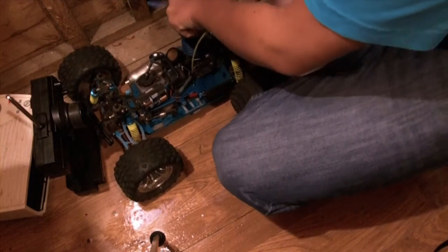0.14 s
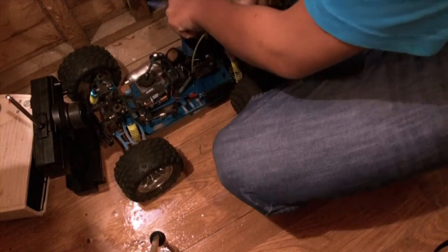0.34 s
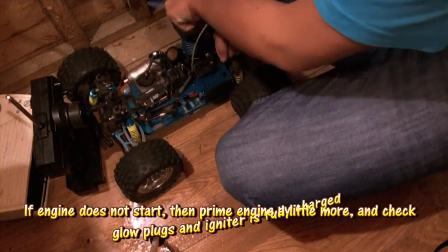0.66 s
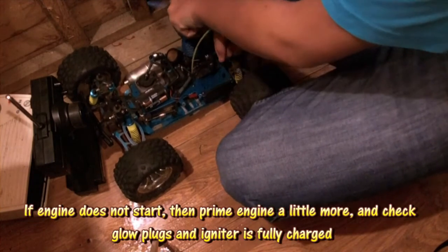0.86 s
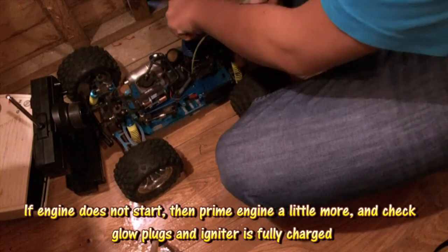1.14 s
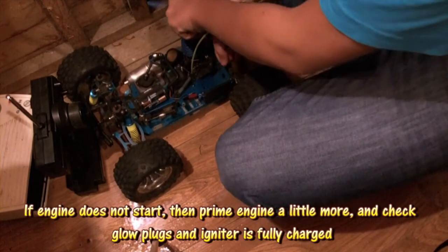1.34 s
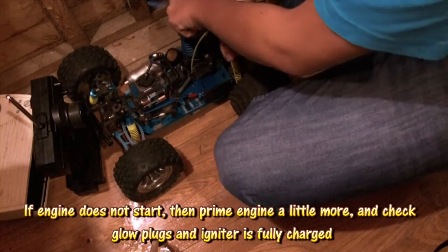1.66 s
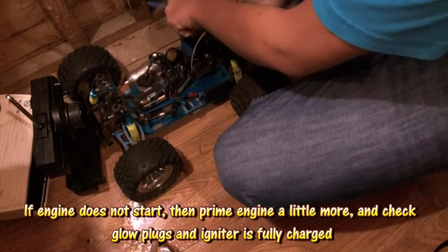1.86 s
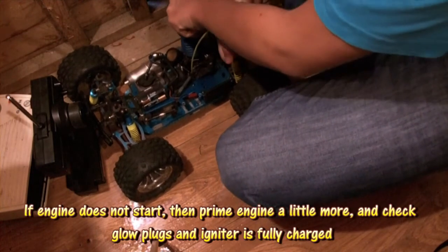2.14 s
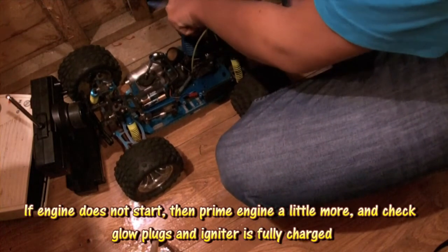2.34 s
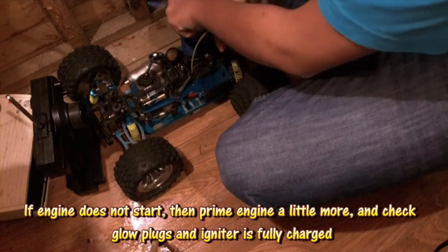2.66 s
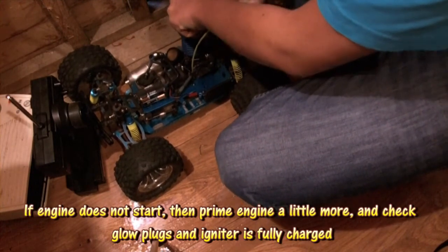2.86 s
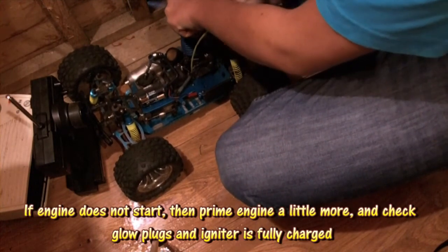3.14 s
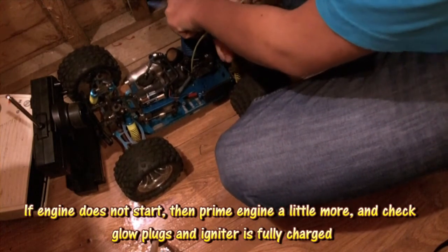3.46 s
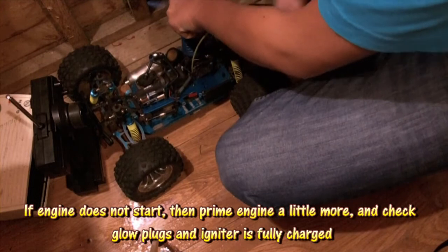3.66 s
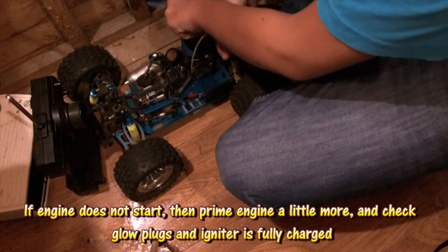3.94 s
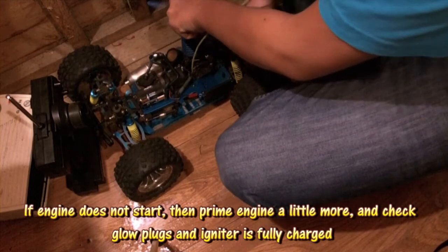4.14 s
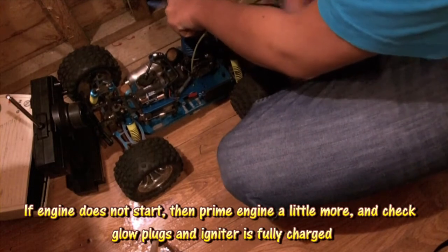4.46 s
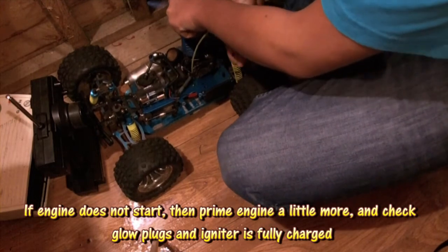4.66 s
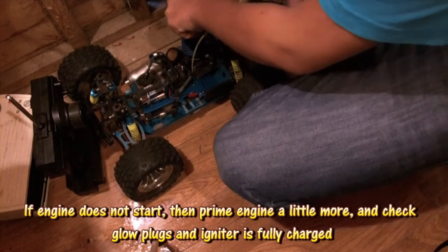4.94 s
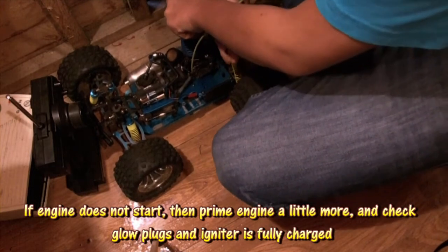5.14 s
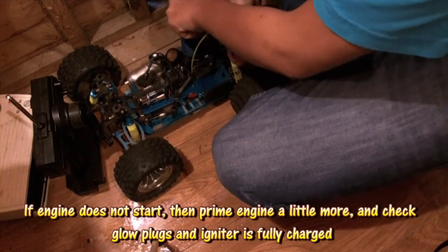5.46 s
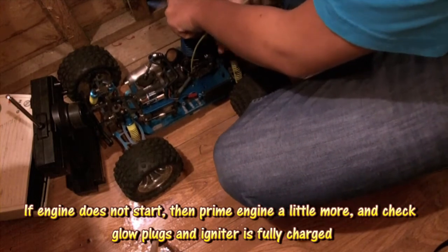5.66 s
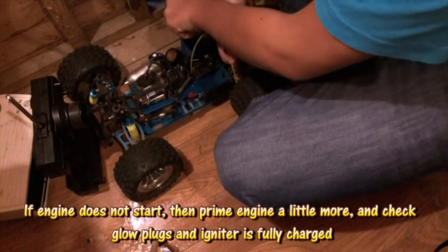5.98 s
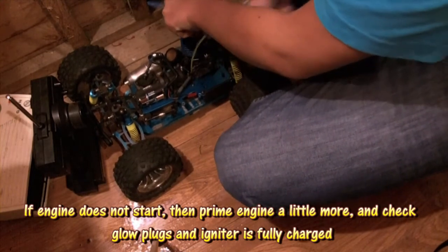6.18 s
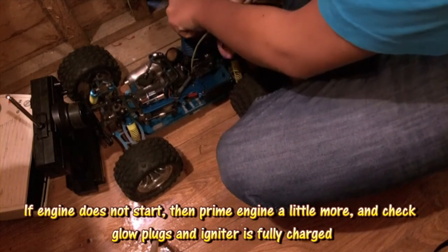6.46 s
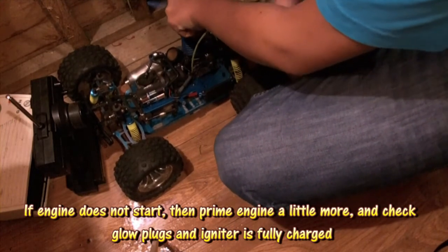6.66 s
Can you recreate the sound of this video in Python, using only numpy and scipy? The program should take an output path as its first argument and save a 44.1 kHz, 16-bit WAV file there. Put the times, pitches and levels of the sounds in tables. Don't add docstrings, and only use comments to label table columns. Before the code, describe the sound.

A small engine's pull cord is yanked again and again in a cramped wooden shed, each pull a rattling, puffing burst that never fires.

```python
import sys
import numpy as np
from scipy import signal
from scipy.fft import rfft, irfft, next_fast_len
from scipy.io import wavfile
from scipy.ndimage import uniform_filter1d

SR = 44100
rng = np.random.default_rng(int(sys.argv[2]) if len(sys.argv) > 2 else 0)


def decibels_to_gain(level_db):
    exponent = np.asarray(level_db, float) / 20
    return 10 ** exponent


def dump(signal):
    limited = np.clip(np.atleast_2d(signal).T, -1, 1)
    pcm = np.round(limited * 32767).astype(np.int16)
    wavfile.write(sys.argv[1], SR, pcm)


N = 300497

# f/Hz, level/dB [per Hz]
ROOM_AIR = [(18, -46), (30, -15), (55, -14.5), (129, -23), (205, -11), (404, -8), (859, -3.5), (1920, -8.5),
            (2920, -13.5), (8470, -16), (15000, -22.5)]
ROOM_AIR_DB = -59.5
# t/s, level/dB
RUSTLE = [(0.0, -70), (0.19, -82), (0.44, -74), (0.68, -66.5), (1.17, -52), (1.35, -83), (2.05, -66),
          (2.18, -66.5), (2.94, -56.5), (3.64, -63), (3.77, -61), (5.01, -63), (5.14, -60), (5.44, -57.5),
          (6.2, -57), (6.81, -63)]
# f/Hz, level/dB
RUSTLE_COLOUR = [(250, -8), (600, 0), (1600, -6), (2400, -20.5)]

CATCHES_S = [-.13, .256, 1.0941, 1.5839, 2.0199, 2.4478, 2.8719, 3.3064, 3.7207, 4.1472, 4.5991, 5.0026,
             5.4285, 5.8692, 6.3291, 6.7149]
# rattle peak level/dB, swell t/s, hold t/s, fall t/s
PULLS = [(-32.5, 0.043, .03, .055), (-27.5, 0.047, 0.0062, 0.061), (-27.5, 0.046, 0.029, 0.054),
         (-25, 0.031, 0.025, .062), (-26.5, 0.035, 0.026, 0.055), (-24.5, 0.046, 0.0068, 0.063),
         (-25.5, .052, 0.0072, 0.054), (-25.5, 0.05, 0.0047, 0.053), (-27, 0.03, 0.038, 0.062),
         (-25.5, 0.043, 0.032, 0.05), (-26.5, 0.038, 0.033, 0.055), (-27, 0.03, 0.045, 0.053),
         (-24.5, 0.054, 0.014, 0.045), (-24.5, 0.059, 0.0095, 0.056), (-25.5, .028, 0.031, 0.042),
         (-26, 0.043, 0.034, 0.047)]
RATTLE_REL_DB = (-1.27, -18, -22.5, -43)
HISS_OVER_DB = (-0.5, -2.5, -2.5, -10, 0, -2.5)
RATTLE_START_DB = -36.5
REWIND_LAG_S, REWIND_S = 0.015, 0.074
# f/Hz, width f/Hz, level/dB
CHASSIS = [(685, 15, -11), (875, 16.3, -0.5), (970, 37, -2), (1132, 53, -3.5), (1427, 49, -9),
           (1532, 46, -4), (1740, 46, -6.5), (1823, 37, 1), (1845, 20, -1.5), (1943, 86, 1.5),
           (2206, 24, -5), (2700, 66, -11)]
# f/Hz, width f/Hz, level/dB
CASING = [(3546, 280, 1), (4070, 130, 3), (5300, 530, -3), (5546, 114, 4.5), (7470, 280, -5),
          (8500, 210, 0), (9270, 1100, -15), (10470, 390, -3), (12000, 83, -14), (9050, 70, 4),
          (9600, 130, -1), (10150, 41, -10.5), (11440, 90, -2), (12650, 90, -6.5)]
# f/Hz, level/dB [per Hz]
GAS = [(2400, -9), (2900, -4.5), (6000, -4), (10500, -4.5), (12100, -16), (12900, -16.5), (13600, -29),
       (15500, -21)]
# f/Hz, level/dB [per Hz]
THUD = [(25, -44), (45, -14), (75, -41.5), (130, -29.5), (200, -5.5), (300, -9), (450, 6), (600, -2),
        (1200, 0.5), (2500, -7), (3500, -53)]
# f/Hz, level/dB
CLATTER = [(500, -10), (900, -1), (1900, 0), (2400, -7), (3300, -10), (4200, -24)]

# t/s, peak level/dB, treble
# minus peak level/dB, t60 t/s, main ring f/Hz
SHIFTS = [(0.043, -40.5, -36, 0.2, 1540), (.1236, -54, -19, .12, 1500), (0.257, -26.5, 2.5, 0.15, 1800),
          (.5314, -60.5, 17, 0.07, 1440), (0.6663, -36.5, -22, 0.097, 1650), (.8035, -41, -8, 0.18, 1450),
          (.9026, -43, -5.5, 0.11, 840), (1.3053, -45.5, -23, 0.2, 2030), (3.074, -37, -30, 0.089, 1050),
          (4.0218, -46, -22, 0.09, 1780), (5.1827, -51.5, 18.5, 0.09, 818)]
SHIFT_BASS_DB = -19
# t/s, peak level/dB, treble minus peak level/dB, t60 t/s
TAKE_UPS = [(.2094, -48.5, 4, 0.69), (1.0554, -44.5, .6, 0.55), (1.5342, -46, -0.5, 0.62),
            (1.9649, -52, -13, .11), (2.3895, -48.5, 1, 0.57), (2.819, -49, 2, 0.88),
            (3.2585, -46, 2, 0.34), (3.679, -42.5, 7.5, .16), (4.098, -46.5, 3.5, 0.43),
            (4.557, -39, 7, 0.15), (4.955, -42.5, 4.5, 0.23), (5.387, -36.5, 6.5, .17),
            (5.8312, -41.5, 9, 0.14), (6.6778, -39, 8, .17)]
TAKE_UP_HZ, TAKE_UP_BASS_DB = 2050, -5
# t/s, peak level/dB, treble minus peak level/dB, ring f/Hz
RECOILS = [(0.3742, -39, -34, 1190), (0.4114, -38, -2.5, 1960), (1.251, -34.5, -24, 1370),
           (1.721, -32.5, -17, 1790), (2.141, -27.5, -8, 1830), (2.5664, -32, -18, 2080),
           (2.584, -29.5, -5, 1840), (3.0034, -26.5, -3, 1800), (3.4363, -25.5, -3.5, 1860),
           (3.8483, -31, -6, 2100), (3.8838, -28.5, -6, 1870), (4.279, -25.5, -6.5, 1850),
           (4.319, -41.5, -6, 1800), (4.7334, -34.5, -22, 1830), (5.557, -32, -30, 1740),
           (5.595, -48.5, 9, 703), (6.01, -28, -5, 1940), (6.034, -38, -22, 1170), (6.449, -28.5, -7, 1890)]
RECOIL_T60_S, RECOIL_BASS_DB = 0.13, -32
CATCH_DB, CATCH_T60_S = -41, 0.06
# f/Hz, level/dB
BOARD_COLOUR = [(250, 7), (400, -3), (900, 10), (1300, -20)]
SPRING_COLOUR = [(2100, -20), (2600, 1), (3300, -2.5), (4600, -9)]

# t/s, peak level/dB
CREAKS = [(0.238, -35.5), (1.074, -41), (1.562, -41), (2, -37), (2.427, -42), (2.854, -36.5), (3.285, -38),
          (3.703, -45), (4.124, -42), (4.577, -39), (4.981, -40.5), (5.409, -40), (5.851, -41),
          (6.307, -37), (6.694, -43)]
CREAK_HZ, CREAK_WIDTH_HZ = 1070, 860

# first puff t/s, first turn t/s, driven puffs [count], last driven turn t/s, its puff level/dB
TURNS = [(.2601, .0208, 3, .0197, -25), (1.0969, .0199, 4, .0222, -24.6), (1.5872, .0217, 3, .0205, -28.6),
         (2.0232, .0218, 3, .0205, -28), (2.451, .0214, 3, .0196, -24.7), (2.8751, .0214, 3, .02, -26.4),
         (3.3095, .0206, 3, .0194, -23.9), (3.7237, .0197, 4, .0191, -24.9),
         (4.1506, .0196, 4, .0193, -25.4), (4.6019, .0193, 4, .0251, -27.2),
         (5.0057, .0196, 4, .0219, -25.9), (5.4316, .0192, 4, .0301, -26.5),
         (5.8722, .0202, 4, .021, -29.3), (6.3324, .0198, 3, .019, -26.5), (6.718, .0193, 4, .0196, -24.6)]
SECOND_TURN_SHARE = 0.884
FIRST_PUFF_DB, FULL_PUFF_DB = -26, -25
COAST_TURN_S = 0.018
COAST_PUFFS_DB = (-38.5, -45, -49)
# f/Hz, level/dB, t60 t/s
PIPE_MODES = [(401, 0, .035), (483, -12.5, .063), (408, -35, .185)]
# f/Hz, level/dB, t60 t/s
BOARD_MODES = [(200.1, -48.5, 0.36), (282.5, -44.5, 0.22), (709.6, -26, 0.11), (563.6, -34, 0.21)]
PORT_OPENS_S = 0.01

# t/s, peak level/dB, treble minus peak level/dB, bass minus peak level/dB
SLAPS = [
    (0.833, -24, -9.5, -13),
    (0.933, -28, -19, -17),
    (1.05, -26.5, -7, -8),
    (2.701, -32.5, -28, -39),
    (2.839, -29, -12, -12),
    (3.068, -31.5, -13, -10),
]
# f/Hz, level/dB
SLAP_MIDDLE = [(500, -11), (900, 0), (1600, 7), (2200, -4), (3400, -29), (4000, -39)]
SLAP_TOP = [(2500, 9), (3200, 0), (8000, -16), (12000, -28)]
SLAP_BASS = [(250, -21), (380, 1.5), (700, 3.5), (900, -6)]

SHED_T60_S, SHED_DB = 0.16, -13
TOP_HZ, NOTCH_HZ = 15150, 7900
BLOW_LENGTH = 8192


def unit(x):
    return x / np.sqrt(np.mean(x ** 2))


def ring(x, hz, width_hz):
    return signal.lfilter(*signal.iirpeak(hz, hz / width_hz, SR), x)


def body(x, modes):
    total = 0
    for k, (hz, width_hz, db) in enumerate(modes):
        total = total + decibels_to_gain(db) * ring(np.roll(x, 37 * k), hz, width_hz)
    return unit(total)


def colour(x, points):
    hz, db = np.transpose(points)
    size = next_fast_len(N)
    log_hz = np.log(np.arange(size // 2 + 1) * SR / size + 1)
    gain = decibels_to_gain(np.interp(log_hz, np.log(hz), db, left=-80, right=-80))
    return unit(irfft(rfft(x, size) * gain, size)[:N])


def walk(rate):
    hold = int(SR / rate)
    steps = np.repeat(rng.standard_normal(N // hold + 1), hold)
    return unit(uniform_filter1d(steps, hold)[:N])


def clicks(rate, scatter_db):
    hit = rng.random(N) < rate / SR
    return hit * rng.standard_normal(N) * decibels_to_gain(scatter_db * np.minimum(rng.exponential(size=N), 4))


def burst(s, db, t60, rise):
    t = np.clip(np.arange(N) / SR - s, 0, 1)
    return decibels_to_gain(db - 60 * t / t60) * np.minimum(t / rise, 1)


def room_air():
    air = colour(rng.standard_normal(N), ROOM_AIR)
    rustle = colour(clicks(1200, 0.62), RUSTLE_COLOUR)
    rustle_db = np.interp(np.arange(N) / SR, *np.transpose(RUSTLE)) + 0.43 * walk(27) - 4
    return decibels_to_gain(ROOM_AIR_DB) * air + decibels_to_gain(rustle_db) * rustle


def starter(puffs, chassis, treble):
    t = np.arange(N) / SR
    rattle_level, hiss_level = np.zeros(N), np.zeros(N)
    for catch, (peak_db, *stages) in zip(CATCHES_S, PULLS):
        times = catch + np.cumsum([0, *stages, REWIND_LAG_S, REWIND_S])
        db = np.r_[RATTLE_START_DB, peak_db, peak_db + np.array(RATTLE_REL_DB)]
        on = (t >= times[0]) * np.exp(-np.maximum(t - times[-1], 0) / 0.018)
        rattle_level += on * decibels_to_gain(np.interp(t, times, db))
        hiss_level += on * decibels_to_gain(np.interp(t, times, db + np.array(HISS_OVER_DB)))
    throb = signal.lfilter([1], [1, -np.exp(-1 / (0.017 * SR))], (puffs > 0).astype(float))
    thud = colour(clicks(1500, 1.5), THUD)
    rattle = chassis * decibels_to_gain(1.32 * throb - 4.5) + decibels_to_gain(-9) * thud
    return rattle_level * rattle + hiss_level * treble * decibels_to_gain(throb - 2)


def all_knocks():
    shifts = [(s, db, top, SHIFT_BASS_DB, t60, hz) for s, db, top, t60, hz in SHIFTS]
    take_ups = [(s, db, top, TAKE_UP_BASS_DB, t60, TAKE_UP_HZ) for s, db, top, t60 in TAKE_UPS]
    recoils = [(s, db, top, RECOIL_BASS_DB, RECOIL_T60_S, hz) for s, db, top, hz in RECOILS]
    return shifts + take_ups + recoils


def knocks(chassis, clatter, treble):
    grit = clicks(2500, 0.43)
    boards = colour(grit, BOARD_COLOUR)
    spring = colour(grit, SPRING_COLOUR)
    blow = np.pad(np.hanning(12), (0, BLOW_LENGTH - 12))
    struck = body(blow, CHASSIS)
    struck = struck / struck.max()
    out = np.zeros(N + BLOW_LENGTH)
    for s, db, treble_db, bass_db, t60, hz in all_knocks():
        i = int(s * SR)
        part = slice(i, min(i + BLOW_LENGTH, N))
        mix = unit(ring(ring(grit[part], hz, 370), hz, 1100))
        mix = mix + decibels_to_gain(-3.5) * spring[part] + decibels_to_gain(-0.5) * clatter[part]
        mix = mix + decibels_to_gain(treble_db) * treble[part] + decibels_to_gain(bass_db) * boards[part]
        out[part] += burst(s, db - 12, t60, rise=0.00079)[part] * mix
        tone = ring(ring(blow, hz, 140), hz, 660)
        out[i:i + BLOW_LENGTH] += decibels_to_gain(db - 8) * (tone / tone.max() + struck)
    for catch in CATCHES_S[2:]:
        i = int(catch * SR)
        out[:N] += burst(catch, CATCH_DB, CATCH_T60_S, rise=0.00034) * (chassis + decibels_to_gain(4.5) * treble)
        out[i:i + BLOW_LENGTH] += decibels_to_gain(-34.5) * struck
        out[i:i + 2] += decibels_to_gain(-31) * np.array([1, -1])
    return out[:N]


def creaks():
    slips = ring(clicks(1500, 1.4), CREAK_HZ, CREAK_WIDTH_HZ)
    housing = unit(ring(slips, CREAK_HZ, 2 * CREAK_WIDTH_HZ))
    level = np.zeros(N)
    for s, db in CREAKS:
        still_tight = np.arange(N) < (s + 0.024) * SR
        level += burst(s, db - 10.5, 0.4, rise=0.0086) * still_tight
    return housing * level


def turns():
    puffs = np.zeros(N + SR)
    for s, first_s, driven, last_s, last_db in TURNS:
        middle = [SECOND_TURN_SHARE * first_s] * (driven - 3)
        gaps = [0, first_s] + middle + [last_s] + [COAST_TURN_S] * 3
        dbs = [FIRST_PUFF_DB] + [FULL_PUFF_DB] * (driven - 2) + [last_db, *COAST_PUFFS_DB]
        puffs[((s + np.cumsum(gaps)) * SR).astype(int) - 9] = decibels_to_gain(dbs)
    return puffs[:N]


def pipe(puffs):
    t = np.arange(8192) / SR
    rings = np.zeros(len(t))
    for k, (hz, db, t60) in enumerate(PIPE_MODES + BOARD_MODES):
        rings += (-1) ** (k + 1) * decibels_to_gain(db - 60 * t / t60) * np.cos(2 * np.pi * hz * t)
    shape = rings * (1 - np.exp(-t / PORT_OPENS_S))
    shape = signal.sosfilt(signal.butter(2, 150, "high", fs=SR, output="sos"), shape)
    return signal.fftconvolve(puffs, shape / np.abs(shape).max())[:N]


def slaps():
    noise = rng.standard_normal(N)
    middle, top, bass = [colour(noise, points) for points in (SLAP_MIDDLE, SLAP_TOP, SLAP_BASS)]
    out = np.zeros(N)
    for s, db, top_db, bass_db in SLAPS:
        out += burst(s, db, 0.019, rise=0.004) * (middle + decibels_to_gain(top_db) * top)
        out += burst(s, db + bass_db - 7, 0.063, rise=0.0042) * bass
    return out


def shed(x):
    t = np.arange(16384) / SR
    tail = rng.standard_normal(len(t)) * decibels_to_gain(-60 * t / SHED_T60_S) * (t > 0.003)
    return x + decibels_to_gain(SHED_DB) * signal.fftconvolve(x, tail / np.sqrt(np.sum(tail ** 2)))[:N]


def scene():
    puffs = turns()
    clatter = colour(clicks(4000, 1.2), CLATTER)
    chassis = unit(body(clicks(2500, 1.1), CHASSIS) + decibels_to_gain(-12) * clatter)
    gas = colour(rng.standard_normal(N), GAS)
    casing = body(clicks(6000, 0.31), CASING)
    treble = unit(casing + decibels_to_gain(-1.5) * gas) * decibels_to_gain(1.36 * walk(200))
    metal = starter(puffs, chassis, treble)
    metal = metal + knocks(chassis, clatter, unit(treble + gas)) + creaks()
    return (room_air() + shed(metal) + pipe(puffs) + slaps())[None]


def band_limit(x):
    return signal.sosfilt(signal.butter(12, 16380, fs=SR, output="sos"), x)


def record(dry):
    dipped = dry - 0.54 * ring(dry, NOTCH_HZ, 190)
    cut = signal.sosfilt(signal.ellip(8, 0.2, 32, TOP_HZ, fs=SR, output="sos"), dipped)
    return band_limit(cut)


dry = scene()
out = record(dry)
dump(out)
```